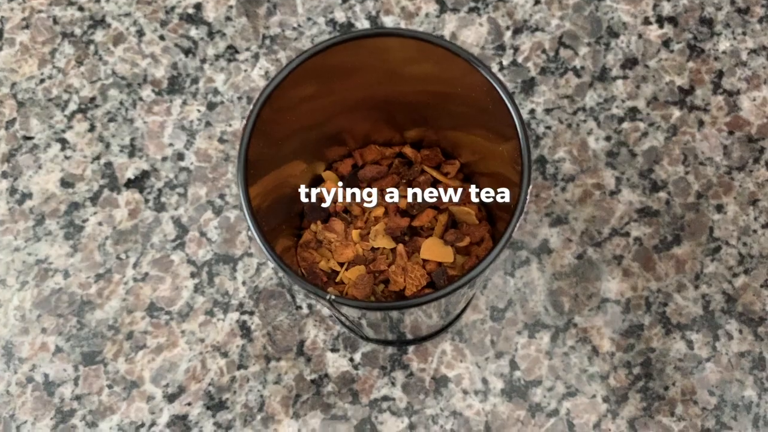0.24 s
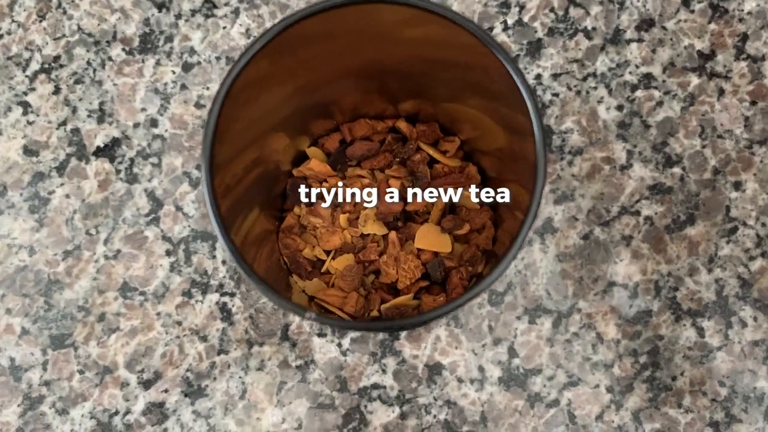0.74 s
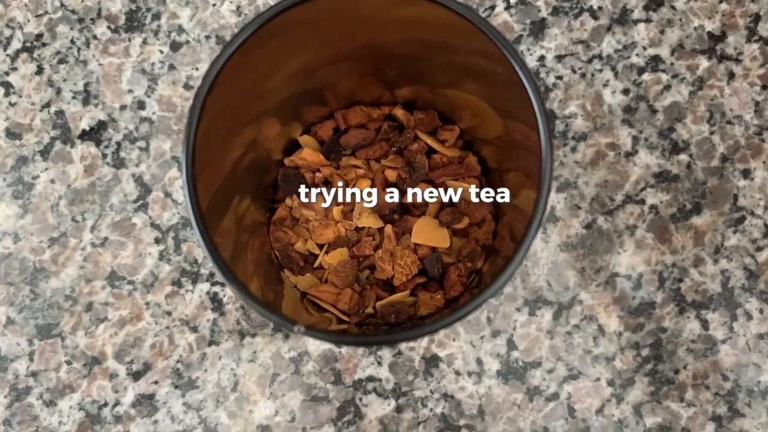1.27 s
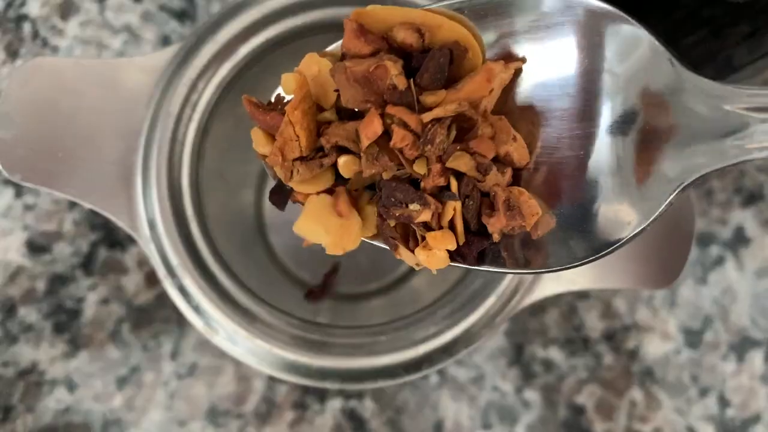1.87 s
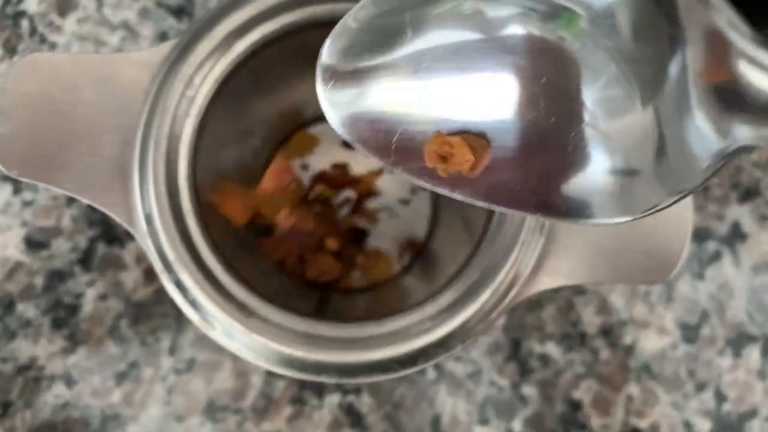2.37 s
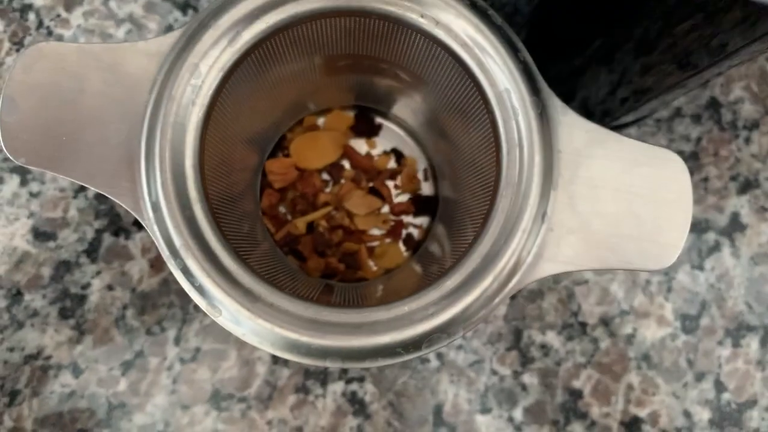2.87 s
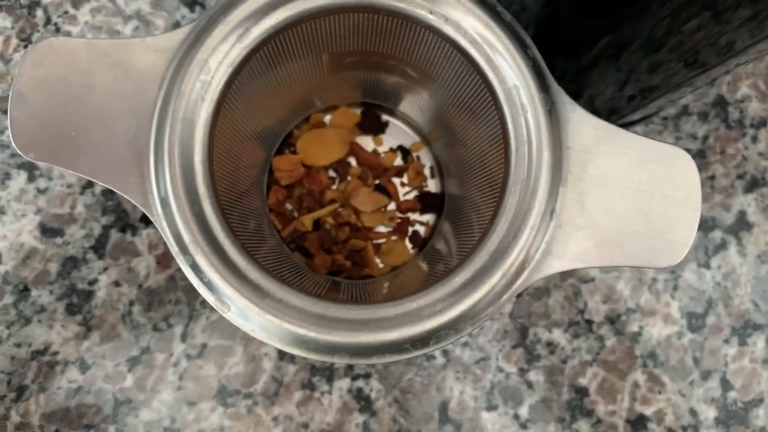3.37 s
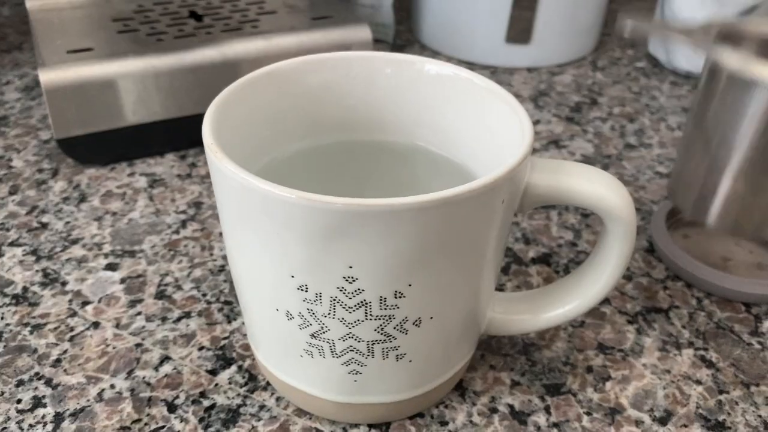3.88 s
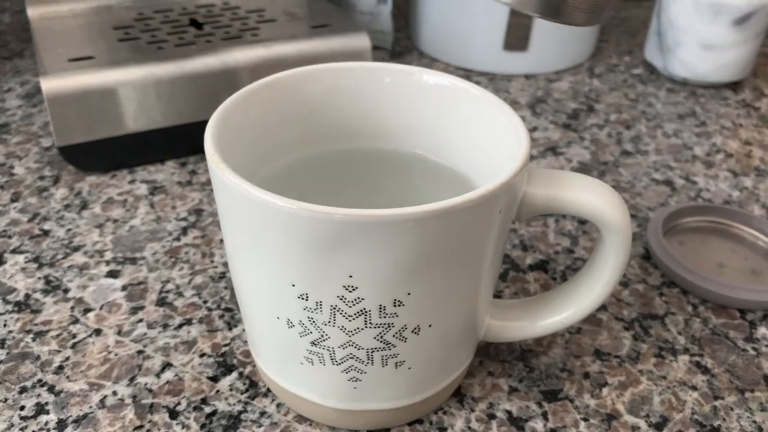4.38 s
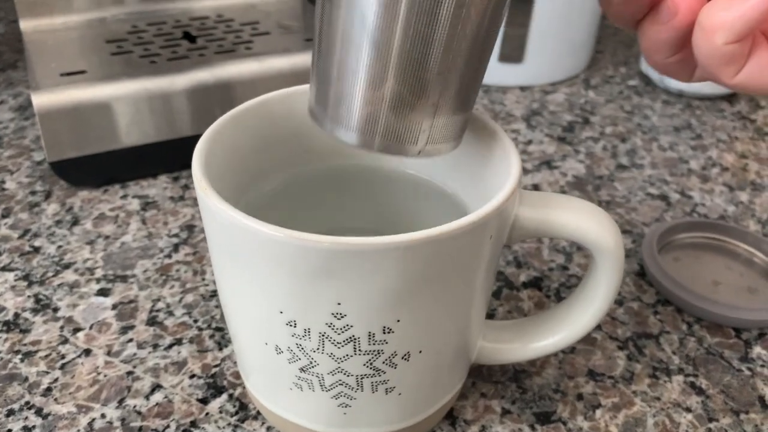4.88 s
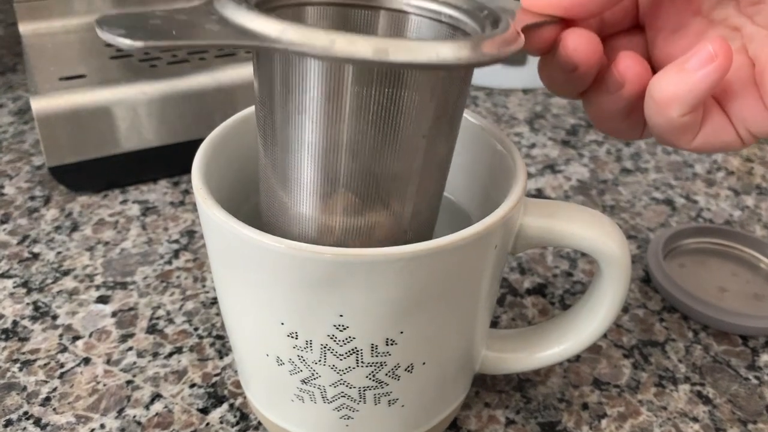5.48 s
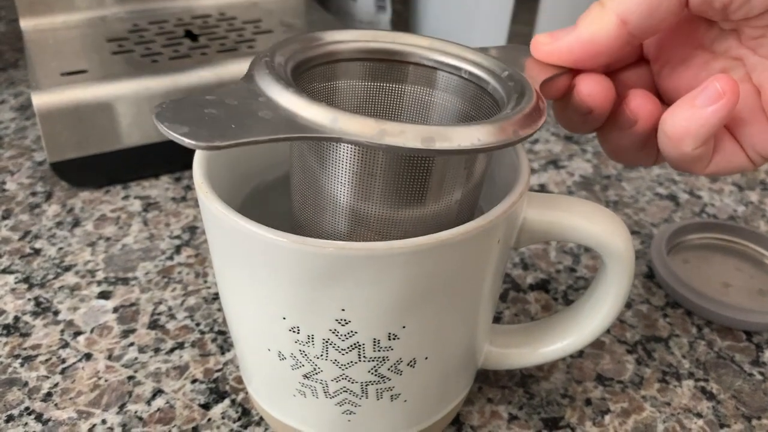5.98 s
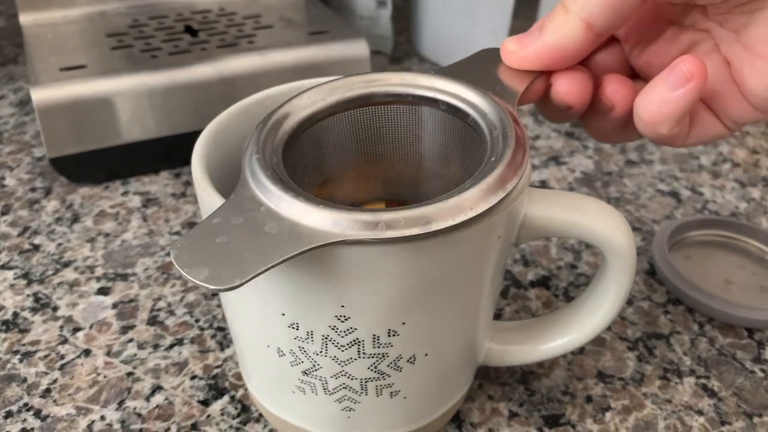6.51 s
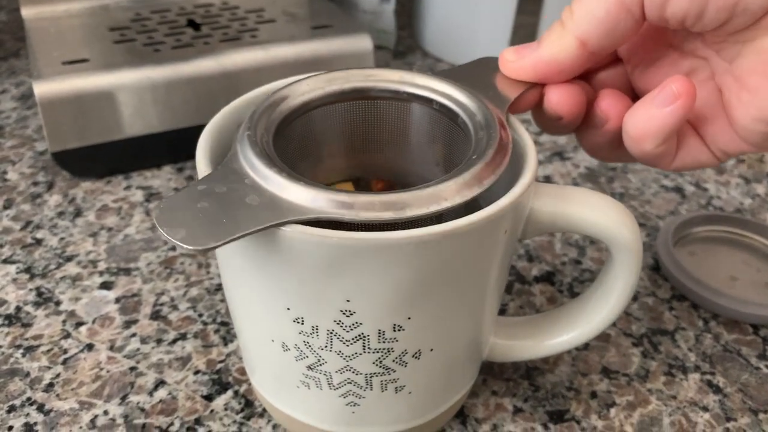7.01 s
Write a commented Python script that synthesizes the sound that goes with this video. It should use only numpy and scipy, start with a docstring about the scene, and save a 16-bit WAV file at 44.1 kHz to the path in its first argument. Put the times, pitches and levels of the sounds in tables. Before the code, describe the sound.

Over a quiet low kitchen hum, crisp bits patter into a metal strainer; later metal drags, thuds and clinks brightly on a mug.

```python
"""Dried fruit tea slides off a spoon into a steel mesh infuser: impulses excite dense modes of mesh and cup.
Later the infuser is lifted off its saucer, drags, bumps and clinks against a ceramic mug on the counter,
and dips into the water, which damps its oval modes: modal synthesis driven by blows and stick-slip.
Behind it, filtered noise and narrow bands make a quiet kitchen with appliance hum at two microphone ports;
the background changes colour and level once, at 3.645 s. A short diffuse tail adds the room."""
import sys
import numpy as np
from scipy import signal
from scipy.fft import irfft
from scipy.io import wavfile
from scipy.ndimage import uniform_filter1d

SR = 44100
rng = np.random.default_rng(int(sys.argv[2]) if len(sys.argv) > 2 else 0)


def wav_out(sig):
    """Save sig, one row per channel (or a flat mono array), as 16-bit PCM at SR to the path in sys.argv[1]."""
    wavfile.write(sys.argv[1], SR, np.round(np.clip(np.atleast_2d(sig).T, -1, 1) * 32767).astype(np.int16))


N = 319725  # samples
TURN_S = 3.645  # the background's colour and level change abruptly here


def gain_of(db):
    """Logarithmic level: converts decibels to an amplitude ratio."""
    return 10 ** (np.asarray(db) / 20)


def read(points, hz):
    """Spectral envelope: interpolates linearly along a log-frequency axis."""
    f, value = np.transpose(points)
    return np.interp(np.log(hz + 1), np.log(f + 1), value)


def add(mix, s, sound):
    """Superposition: adds a two-port sound to the mix from time s."""
    part = mix[:, round(s * SR):][:, :sound.shape[1]]
    part += sound[:, :part.shape[1]]


def sides(left_db):
    """Level difference between ports: splits a balance in dB evenly between left and right."""
    return gain_of(np.multiply.outer([.5, -.5], left_db))


def stretches(curves):
    """Amplitude envelope: sums level curves interpolated in dB, at -150 dB outside each."""
    t = np.arange(N) / SR
    envelope = 0
    for rows in curves:
        envelope = envelope + gain_of(np.interp(t, *np.transpose(rows), left=-150, right=-150))
    return envelope


def ring(modes, centre_hz=None, octaves=1., rise_s=0.00076, size=SR):
    """Modal superposition: damped sines with port balance and lag; a blow may favour modes near a centre."""
    hz, db, t60, *port = np.transpose(modes)[:, :, None]
    left_db, lag = port or (np.full_like(hz, 1.2), -1.1 * np.tanh(hz / 1500))
    if centre_hz:
        db = db - 6 * (np.log2(hz / centre_hz) / octaves) ** 2
    t = np.arange(size) / SR
    level = gain_of(db - 60 * t / t60) * (1 - np.exp(-t / rise_s)) ** 2
    phase = 2 * np.pi * hz * t - np.multiply.outer([-.5, .5], lag)
    return (sides(left_db) * level * np.sin(phase)).sum(axis=1)


# room-tone colour before and after the turn, and microphone hiss: f/Hz, level/dB per Hz
EARLY_COLOUR = [(18, -36), (30, -11), (60, 2), (82, -18), (197, -15.5), (247, -18.5), (303, -15),
                (365, -26.5), (396, -16.5), (429, -25.5), (4000, -67), (5200, -102)]
LATE_COLOUR = [(18, -34), (30, -12.5), (63, -9), (82, -11), (136, -27), (297, -21), (336, -20),
               (421, -28.5), (457, -21.5), (486, -34), (4000, -66.5), (5600, -105)]
HISS_COLOUR = [(1760, -24), (3000, -13.5), (4140, -4), (6080, -5.5), (9390, -4), (15100, -5),
               (16200, -14.5), (16500, -33.5)]
EARLY_DB, LATE_DB, HISS_DB = -49.5, -51, -79.5  # rms
# likeness of the noise at the two ports: f/Hz, likeness/1
TONE_LIKENESS = [(60, 0.94), (130, 0.35), (290, 0.76), (640, 0.024), (1410, 0.019), (3100, 0.036),
                 (6820, 0.13), (15000, 1)]
# port balance of the noise: f/Hz, left-right level/dB
TONE_BALANCE = [(60, 4.9), (110, 4.5), (200, 1.2), (2000, 0.32)]


def room_tone():
    """Partially coherent noise: random short-time spectra with mild patches, recoloured at the turn."""
    frames, hz = N // 512 + 5, np.fft.rfftfreq(2048, 1 / SR)
    a, b, c, d, patches = rng.standard_normal((frames, 1025, 5)).T
    patches = uniform_filter1d(patches, size=6, axis=1)
    patches = uniform_filter1d(patches, size=14, axis=0)
    same = np.clip(read(TONE_LIKENESS, hz), -1, 1)[:, None]
    left = a + 1j * b
    right = same * left + np.sqrt(1 - same ** 2) * (c + 1j * d)
    z = np.array([left, right]) * sides(read(TONE_BALANCE, hz))[:, :, None]
    z *= gain_of(1.8 * patches / patches.std()) * (hz > 25)[:, None]
    low_cut = np.sqrt(1 + (62 / (hz + 1)) ** 4)
    noises = []
    for colour, db in ((EARLY_COLOUR, EARLY_DB), (LATE_COLOUR, LATE_DB), (HISS_COLOUR, HISS_DB)):
        shape = gain_of(read(colour, hz)) / low_cut
        x = signal.istft(z * shape[:, None], nperseg=2048, noverlap=1536)[1][:, :N]
        noises.append(gain_of(db) * x / x.std())
    early, late, hiss = noises
    return np.where(np.arange(N) < TURN_S * SR, early, late) + hiss


# appliance hum bands: f/Hz, width/Hz, level before the turn/dB, level after it/dB, left-right level/dB
HUM_BANDS = [(37.7, 1.7, -62.5, -52, 6.5), (113.8, 7.9, -62.5, -67, 8), (199, 6, -57.5, -67.5, -1),
             (303.5, 5.5, -64, -72.5, 5.5), (335, 1.2, -66, -63.5, -3), (392, 5.7, -67, -76.5, 2)]
# wavering level of a low throbbing hum tone: t/s, level/dB
THROB_LEVEL = [(0.0, -49.5), (0.22, -43.5), (1.55, -45.5), (1.62, -66), (1.71, -43), (2.69, -46),
               (2.89, -38.5), (3.25, -41.5), (3.33, -61.5), (3.59, -39), (3.69, -47.5), (7.19, -47)]
THROB_HZ = 54.85


def hum():
    """Narrow-band noise: random spectra under resonance curves waver, beside one level-modulated sine."""
    t, out, hz = np.arange(N) / SR, np.zeros((2, N)), np.fft.rfftfreq(N, 1 / SR)
    for f, width, early_db, late_db, left_db in HUM_BANDS:
        noise = rng.standard_normal(len(hz)) + 1j * rng.standard_normal(len(hz))
        band = irfft(noise / (1 + (2 * (hz - f) / width) ** 2), N)
        level = gain_of(np.where(t < TURN_S, early_db, late_db))
        out += sides(left_db)[:, None] * band / band.std() * level
    throb_level = np.sqrt(2) * gain_of(np.interp(t, *np.transpose(THROB_LEVEL)))  # rms to peak
    throb = throb_level * np.sin(2 * np.pi * THROB_HZ * t + [[.25], [0]])
    return out + sides(5.5)[:, None] * throb


def kitchen(x):
    """Diffuse reverberation: convolution with decaying noise whose treble dies first."""
    hz, t, z = signal.stft(rng.standard_normal((2, SR // 2)), SR, nperseg=256)
    port_difference = np.clip(1.1 - hz / 12000, .1, 1)[:, None]  # the ports are more alike in the treble
    z = z[:1] + port_difference * (z - z[:1])
    t60 = read([(300, 0.41), (2000, 0.13), (12000, 0.048)], hz)[:, None]  # f/Hz, t60/s
    tail = signal.istft(z * gain_of(-60 * t / t60), SR, nperseg=256)[1]
    tail[:, :200] = 0  # samples before the first reflection
    return signal.oaconvolve(x, tail / np.linalg.norm(tail[0]), axes=1)[:, :N]


# colour of the mesh's many modes: f/Hz, level/dB
MESH_COLOUR = [(1290, -55), (2400, -26), (2760, -13.5), (3030, -38.5), (3380, -11), (5030, -14.5),
               (8920, -1.5), (9780, 1), (10600, -1.5), (12900, -0.5), (15200, -4.5), (16100, -14.5),
               (16500, -32.5)]
# likeness of the mesh modes at the two ports: f/Hz, likeness/1
MESH_LIKENESS = [(2400, .6), (5000, .2), (7000, 0.67), (12000, 0.98)]
# port balance of the mesh: f/Hz, left-right level/dB
MESH_BALANCE = [(1500, 4.7), (3500, 1.1), (8000, .1)]
# lag of the left port in the mesh's shared part: f/Hz, lag/rad
MESH_PORT_LAG = [(7500, 1.9), (10500, 0.63), (12000, 0.033)]


def mesh(tilts_db, t60, tail_db, tail_t60, scatter, count=350, size=9000):
    """High modal density: one tap per tilt in dB per octave, each weighting the same modes anew; mean peak 1."""
    hz = np.geomspace(2200, 16400, count) * rng.uniform(0.89, 1.005, count)
    t = np.arange(size) / SR
    life = 8000 / hz[:, None]  # low modes last longer; the t60 settings hold at 8 kHz
    decay = gain_of(-60 * t / (t60 * life)) + gain_of(tail_db - 60 * t / (tail_t60 * life))
    waves = decay * (1 - np.exp(-t / 0.00012)) * np.exp(2j * np.pi * hz[:, None] * t)
    a, b, c, d = rng.standard_normal((len(tilts_db), 4, count)).transpose(1, 0, 2)
    # scattered phases spread the first click
    left = (1 + 0.18 * a) * np.exp(1j * np.reshape(scatter, (-1, 1)) * b)
    same = np.clip(read(MESH_LIKENESS, hz), -1, 1)
    shared = same * left * np.exp(1j * read(MESH_PORT_LAG, hz))
    right = shared + np.sqrt((1 - same ** 2) / 2) * (c + 1j * d)
    pair = np.array([left, right]) * sides(read(MESH_BALANCE, hz))[:, None]
    tilt = np.outer(tilts_db, np.log2(hz / 9000))
    pair *= gain_of(read(MESH_COLOUR, hz) + tilt) * np.sqrt(hz)
    taps = (pair @ waves).imag.transpose(1, 0, 2)
    return taps / abs(taps.mean(axis=1)).max(axis=1)[:, None, None]


# modes of the counter: f/Hz, level/dB, t60/s
COUNTER_MODES = [(105, -1.5, 0.21), (249, 3, 0.042), (330.7, 7.5, 0.057), (390.4, 1, 0.05),
                 (519, -10, 0.11), (699, -5, 0.065), (762, -3, 0.092), (1030, 4, 0.036), (1248, 2.5, 0.037)]
# modes of the cup, also rung by the tea: f/Hz, level/dB, t60/s, left-right level/dB, right-port lag/rad
CUP_MODES = [(1880, 0, .085, 5, -2.4), (1830, -8, .085, 5, -2.4), (2730, -10, .03, 3, -1.4),
             (3280, -2, .028, 3, -1.8), (3440, -3, .028, 3, -1.8)]
# bumps: t/s, counter level/dB, colour centre f/Hz, width/octaves, mesh level/dB, mesh tilt/dB per octave
BUMP_EVENTS = [(2.797, -65.5, 1850, 0.58, -77, -3), (3.682, -50.5, 1220, 0.48, -106, 1),
               (3.735, -64, 902, 0.55, -60, -2), (3.764, -51.5, 721, 0.7, -61, -7),
               (3.812, -43.5, 434, 0.74, -43, 2), (4.727, -31, 350, 1.17, -21.5, 4),
               (4.735, -29, 108, 1.4, -90.5, -12.5), (4.774, -47.5, 1245, 0.24, -92.5, 1),
               (4.807, -46.5, 1260, 0.33, -85, -3), (4.855, -36, 700, 2.3, -52.5, -4),
               (5.499, -37, 520, 1.05, -44, -0.5), (5.764, -60.5, 1000, 0.38, -87.5, 12.5),
               (6.561, -36.5, 342, 0.91, -56, -10.5), (6.592, -49.5, 350, 0.98, -76, -2.5)]


def bumps():
    """Impact excitation: dull blows boom the counter, rattle as band noise and shake mesh and cup."""
    out, t = np.zeros((2, N)), np.arange(SR // 3) / SR
    cup = ring(CUP_MODES, 3400, .3, 0.00044, size=9000)
    taps = mesh(np.transpose(BUMP_EVENTS)[5], t60=0.029, tail_db=-14.5, tail_t60=0.21, scatter=3.43)
    for (s, counter_db, centre_hz, octaves, mesh_db, tilt_db), tap in zip(BUMP_EVENTS, taps):
        thud = ring(COUNTER_MODES, centre_hz, octaves, rise_s=0.00056, size=len(t))
        edges_hz = centre_hz * 2 ** (np.array([-.4, .45]) * octaves)
        band = signal.butter(3, edges_hz, "band", fs=SR, output="sos")
        rattle = rng.standard_normal((2, len(t))) * gain_of(-60 * t / 0.072) * (1 - np.exp(-t / 0.0042))
        grit = signal.sosfilt(band, rattle)
        add(out, s, gain_of(counter_db) * (thud + gain_of(21.5) * grit))
        cup_gain = gain_of(-33.5 - 1.5 * tilt_db)  # dull shakes ring the cup more
        add(out, s, gain_of(mesh_db) * (tap + cup_gain * cup))
    return out


# the infuser dragging over its saucer, then two brushes of the mug; one curve each: t/s, level/dB
DRAG_CURVES = [
    [(3.68, -54), (3.72, -82), (3.74, -61.5), (3.81, -58.5), (3.87, -99.5)],
    [(5.68, -75), (5.71, -74.5), (5.77, -70), (5.81, -99.5)],
    [(6.02, -86.5), (6.12, -93), (6.17, -99), (6.21, -80), (6.26, -95)],
]
# extra damping on the saucer and when held free: t60/s
DRAG_DAMPING = (0.041, 0.3)
SLIPS_PER_S = 320  # mean rate
# two oval modes of the infuser held in the air: f/Hz, level/dB, t60/s, left-right level/dB, right-port lag/rad
OVAL_MODES = [
    [(1884, 0.013, 0.45, 2.3, -2.0)],
    [(2031, 0, 0.6, 1.5, 1)],
]
# overtones of a clink: f/Hz, level for a wall blow/dB, level for a rim blow/dB, t60/s
OVERTONE_MODES = [(2850, -6, -8, .14), (3550, 4, 15, .035), (3946, 0, -3, .45), (4721, 0, 4, .13),
                  (4972, -6, -25, .3), (5690, -20, 13, .25), (6438, -4, -25, .2), (7477, 2, -25, .16),
                  (8250, -14, 2, .16), (9006, -18, 11, .17), (11200, -30, 3, .17)]


def drag():
    """Stick-slip friction: random slips ring the oval modes and faintly the rim, freer against the mug."""
    out = np.zeros((2, N))
    slips = rng.standard_normal(N) * (rng.random(N) < SLIPS_PER_S / SR)
    rim = np.delete(OVERTONE_MODES, obj=1, axis=1)
    body = gain_of(-1) * ring(OVAL_MODES[0], size=12000) + ring(OVAL_MODES[1], size=12000)
    body = body + gain_of(-25) * ring(rim, size=12000)
    for curves, t60 in zip((DRAG_CURVES[:1], DRAG_CURVES[1:]), DRAG_DAMPING):
        damp = gain_of(-60 * np.arange(12000) / SR / t60)
        out += signal.oaconvolve((stretches(curves) * slips)[None], damp * body, axes=1)[:, :N]
    return out


# clinks: t/s, lower oval level/dB, upper oval level/dB, wall overtone level/dB, rim overtone level/dB,
# free ring before a touch damps it/s
CLINK_EVENTS = [(4.729, -50, -39, -68, -71, 0.13), (4.856, -30.5, -29, -56, -88, .52),
                (5.499, -44, -52.5, -98, -60, 0.29), (6.807, -68, -67.5, -99, -99, 0.011)]
# time constants with which the lower and upper oval modes bloom: rise/s
OVAL_RISE = (0.0051, 0.00033)
CONTACT_S, SOFTER = .0015, .5  # contact time of a -30 dB clink; dB it grows per dB of weaker blow
WET_S, WET_DB_PER_S = 5.3, 70  # clinks after the dip into the water: added decay of the oval modes


def clinks():
    """Modal participation: steel on ceramic shares each blow among the modes until a touch damps them."""
    out, t = np.zeros((2, N)), np.arange(SR) / SR
    wall = np.delete(OVERTONE_MODES, obj=2, axis=1)
    rim = np.delete(OVERTONE_MODES, obj=1, axis=1)
    bodies = [ring(mode, rise_s=rise_s) for mode, rise_s in zip(OVAL_MODES, OVAL_RISE)]
    bodies += [ring(modes, rise_s=0.0004) for modes in (wall, rim)]
    for s, *ring_db, free_s in CLINK_EVENTS:
        contact_s = CONTACT_S * gain_of(-SOFTER * (max(ring_db) + 30))
        touch = gain_of(-350 * np.maximum(t - free_s, 0))
        shape = (1 - np.exp(-t / contact_s)) * touch
        wet = gain_of(-WET_DB_PER_S * t * (s > WET_S))
        blow = sum(gain_of(db) * body * damp for db, body, damp in zip(ring_db, bodies, (wet, wet, 1, 1)))
        add(out, s, shape * blow)
    return out


# large tea pieces landing or shifting, and at 2.68 s a dry tap of the spoon:
# t/s, level/dB, cup ring level/dB, brightness/dB per octave, tumble/s
LANDINGS = [(1.963, -22.5, -66.5, 5.5, .0023), (1.979, -31.5, -64, -1.5, 0.0012),
            (1.9964, -4.5, -36.5, 4.5, 0.00077), (2.1081, -9, -22, 1, 0.00034),
            (2.15, -24, -46, -2, 0.0028), (2.159, -21, -34.5, 1.5, 0.0005), (2.17, -13.5, -31.5, 0, 0.0023),
            (2.2029, -14.5, -48.5, 0.5, 0.0031), (2.265, -24, -61, 5.5, 0.0014),
            (2.2763, -4, -26, 0.5, 0.00046), (2.3, -18.5, -42.5, -1, 0.0011),
            (2.3267, -16.5, -30.5, -1, 0.0025), (2.348, -20, -51, 0, 0.0004), (2.3576, -14, -27, -4, .002),
            (2.366, -16.5, -33.5, -1.5, .001), (2.3923, -10, -21, -0.5, 0.0043),
            (2.409, -26.5, -38.5, -7.5, 0.0052), (2.433, -15, -23, 4.5, .003),
            (2.4685, -16, -28, -4, 0.00051), (2.511, -22.5, -43.5, -1.5, 0.0046),
            (2.6801, -24.5, -58.5, 7.5, 0.00092), (2.683, -27, -38, -6, 0.00042),
            (2.708, -24.5, -59, 6, 0.00031), (2.9425, -48.5, -69, -7.5, 0.0031),
            (4.048, -56.5, -89.5, 4.5, 0.0037), (6.1687, -58.5, -72.5, -3.5, 0.0034)]
# small crumbs as the spoon pours, then as the infuser is lifted; one curve each: t/s, relative level/dB
CRUMB_CURVES = [
    [(1.964, -40), (2.03, -52.5), (2.09, -58), (2.2, -33), (2.3, -41), (2.4, -25), (2.5, -29.5),
     (2.63, -77.5)],
    [(3.72, -97), (3.818, -52), (3.87, -115)],
]
# modes of the cup's floor: f/Hz, level/dB, t60/s, left-right level/dB, right-port lag/rad
FLOOR_MODES = [(590, -5, .15, .1, .5), (800, 0, .05, .1, .5)]


def tea():
    """Impulse response: tumbling pieces, a spoon tap and uneven crumbs are convolved with mesh and cup modes."""
    out = np.zeros((2, N))
    upper = ring(CUP_MODES, 3300, .3, .001, size=9000)
    lower = ring(CUP_MODES, 1880, .3, .001, size=9000)
    floor = gain_of(-35.0) * ring(FLOOR_MODES, rise_s=0.002, size=9000)
    columns = np.transpose(LANDINGS)
    scatter = 1.5 * np.tanh(columns[4] / .0015)  # a hard, short landing clicks
    taps = mesh(columns[3], t60=0.023, tail_db=-21.5, tail_t60=0.13, scatter=scatter)
    lucks = rng.standard_normal((len(LANDINGS), 2, 6))
    for (s, db, cup_db, tilt_db, tumble_s), tap, (delay, strength) in zip(LANDINGS, taps, lucks):
        tumble = np.zeros(1500)  # the first touch and up to six more of uneven strength
        touches = np.minimum(abs(delay) * tumble_s * SR, 1499).astype(int)
        tumble[touches] = strength * np.tanh(tumble_s / .003)
        tumble[0] = 1
        landing = tap + gain_of(-8.5) * floor + gain_of(-15.5 - 1.6 * tilt_db) * upper
        sound = gain_of(db) * landing + gain_of(cup_db) * np.sign(strength[0]) * lower
        add(out, s, signal.oaconvolve(sound, tumble[None] / np.linalg.norm(tumble), axes=1))
    uneven = gain_of(4.2 * np.minimum(rng.exponential(1, N), 3))
    landed = rng.random(N) < 320 / SR  # mean of 320 crumbs per second
    crumbs = stretches(CRUMB_CURVES) * uneven * landed * rng.choice([-1, 1], N)
    spot = rng.integers(0, 8, N)  # each crumb strikes one of eight spots
    for k, tap in enumerate(mesh(np.linspace(-4, 5, 8), t60=0.033, tail_db=-18.5, tail_t60=0.11, scatter=1.4)):
        wall = gain_of(-19.5) * lower if k % 2 else gain_of(-18.5) * upper
        hits = (crumbs * (spot == k))[None]
        out += gain_of(-1.0) * signal.oaconvolve(hits, tap + floor + wall, axes=1)[:, :N]
    return out


def scene():
    """Linear superposition: near sounds, their room tail and the kitchen background."""
    near = tea() + drag() + clinks() + bumps()
    return near + gain_of(-11) * kitchen(near) + room_tone() + hum()


def record(dry):
    """Band limiting: a linear-phase low-pass at 17 kHz stands for the recorder."""
    low_pass = signal.firwin(511, 17000, window=("kaiser", 9), fs=SR)
    return signal.oaconvolve(dry, low_pass[None], "same")


dry = scene()
out = record(dry)
wav_out(out)
```